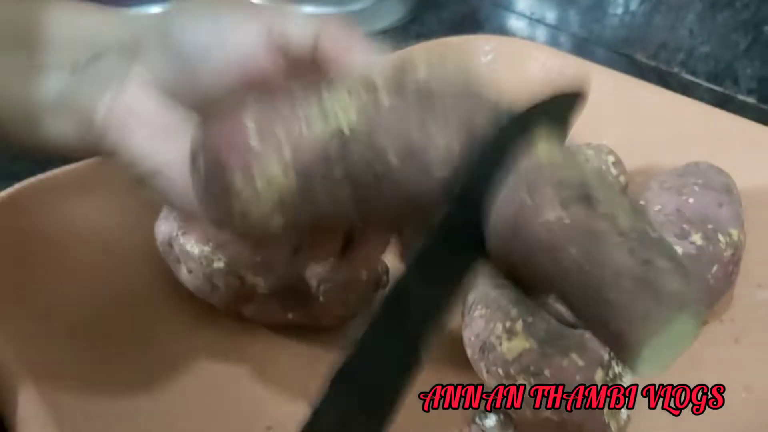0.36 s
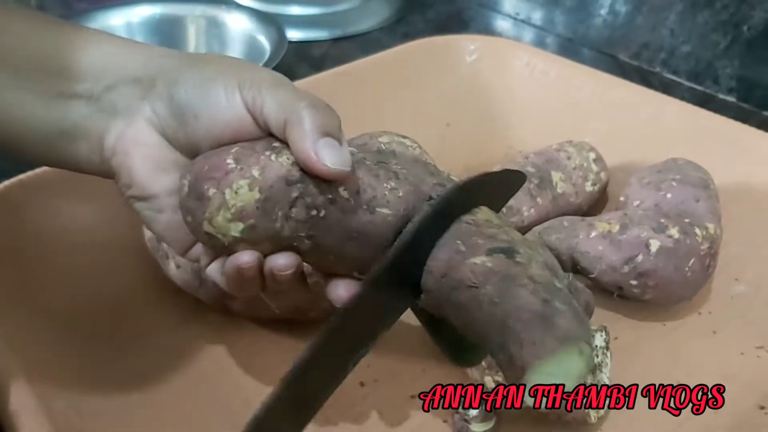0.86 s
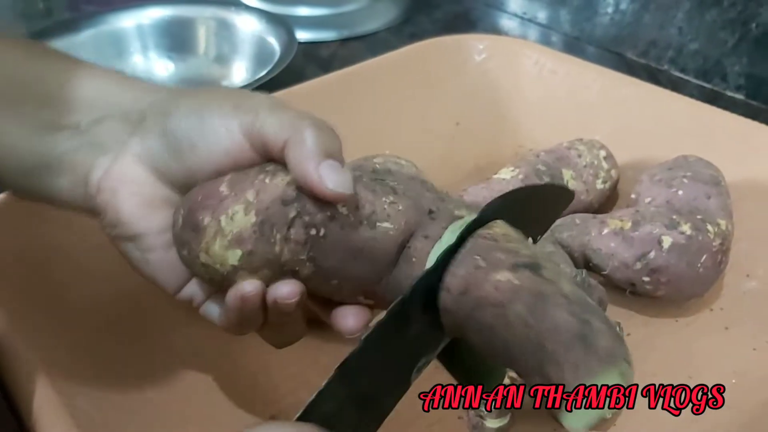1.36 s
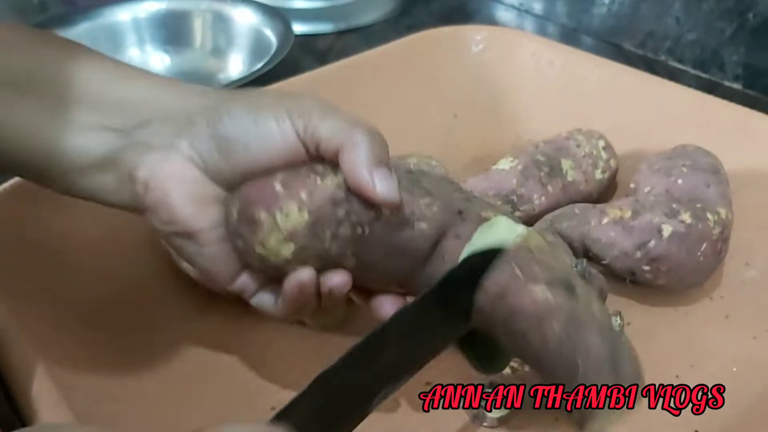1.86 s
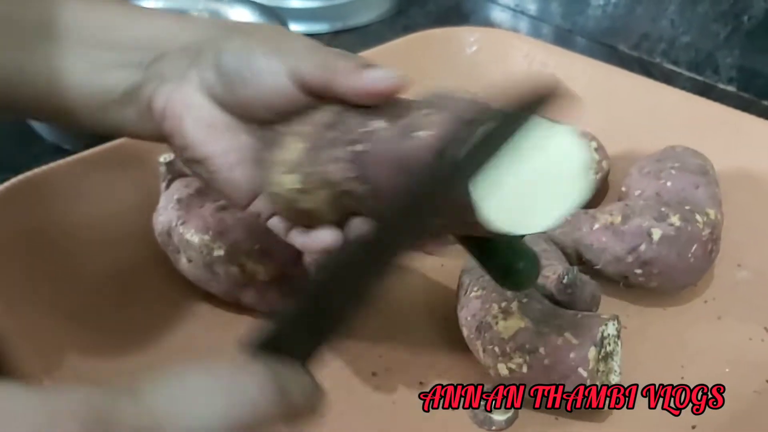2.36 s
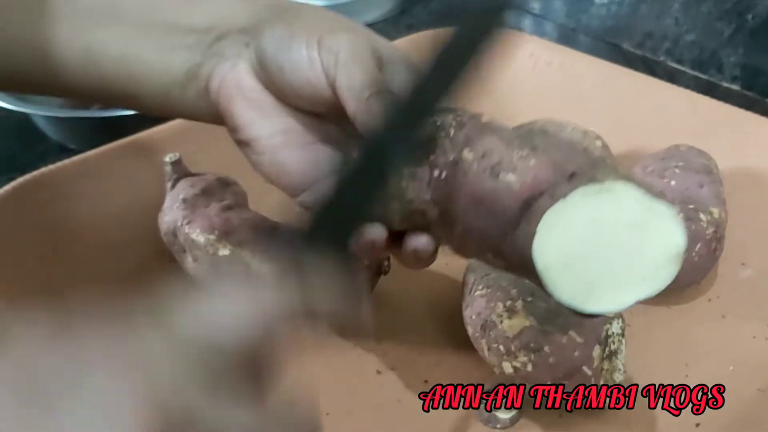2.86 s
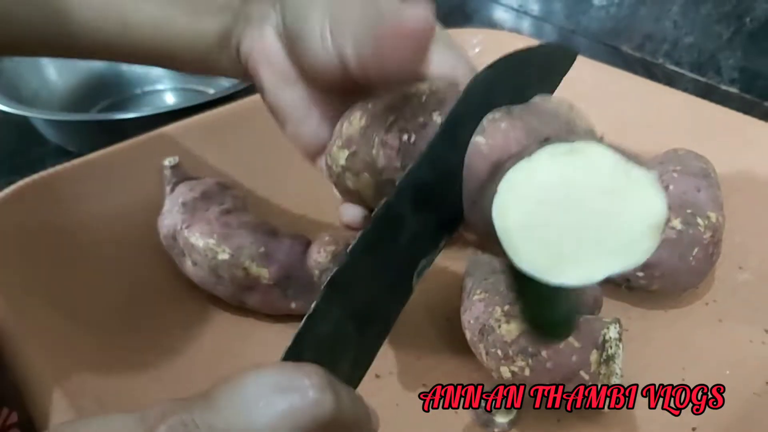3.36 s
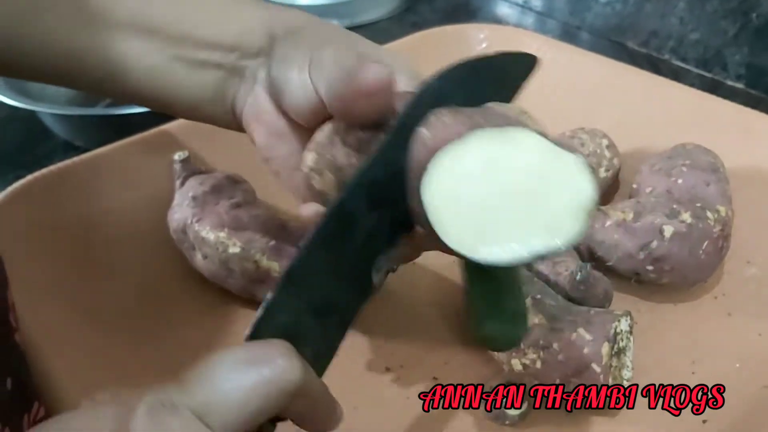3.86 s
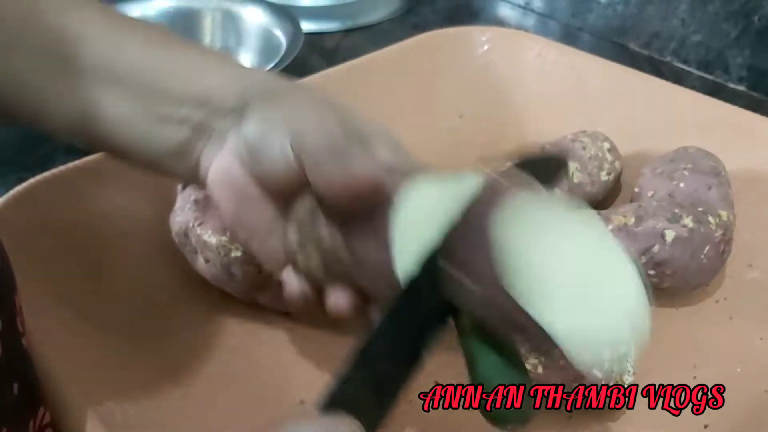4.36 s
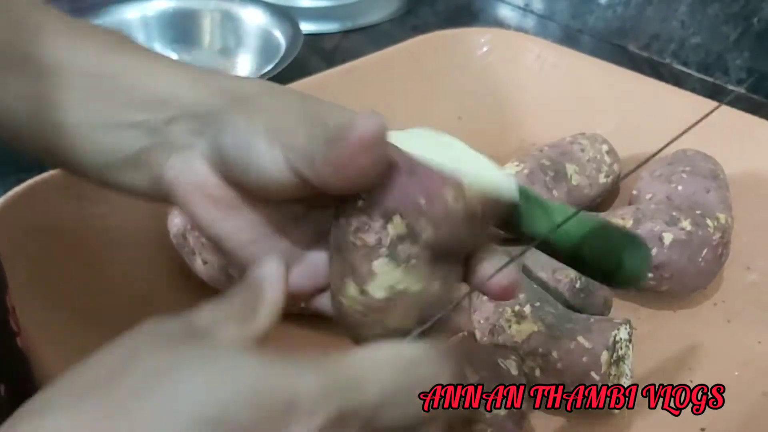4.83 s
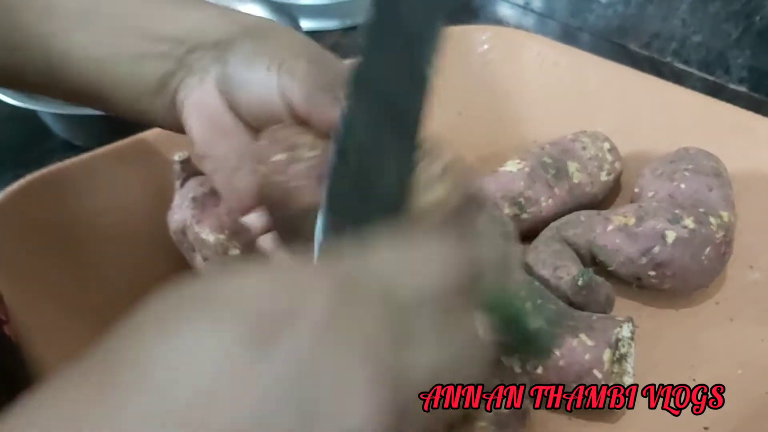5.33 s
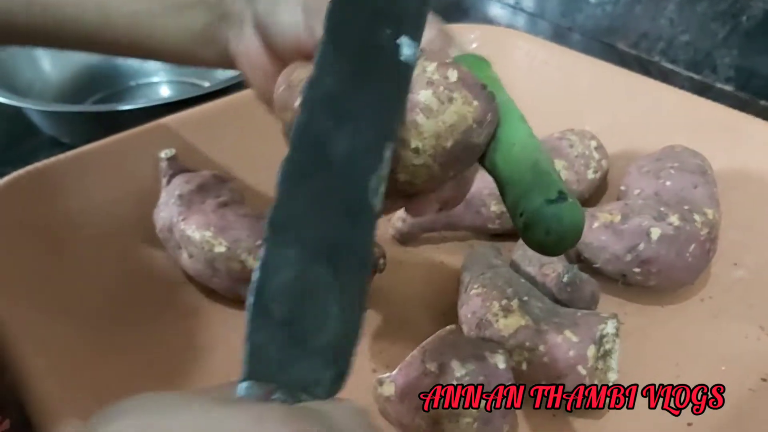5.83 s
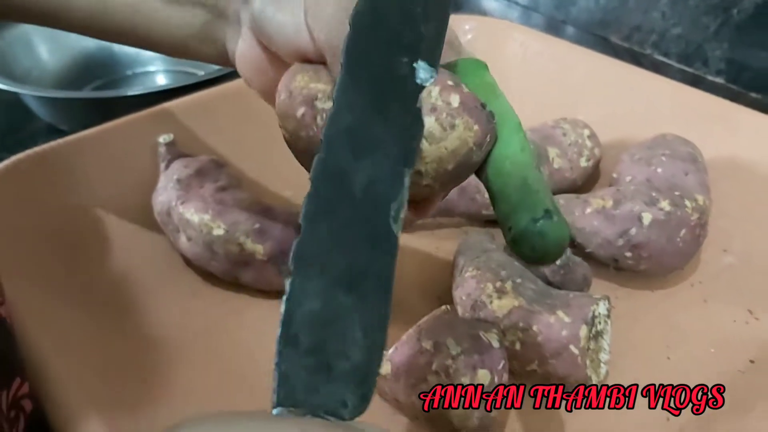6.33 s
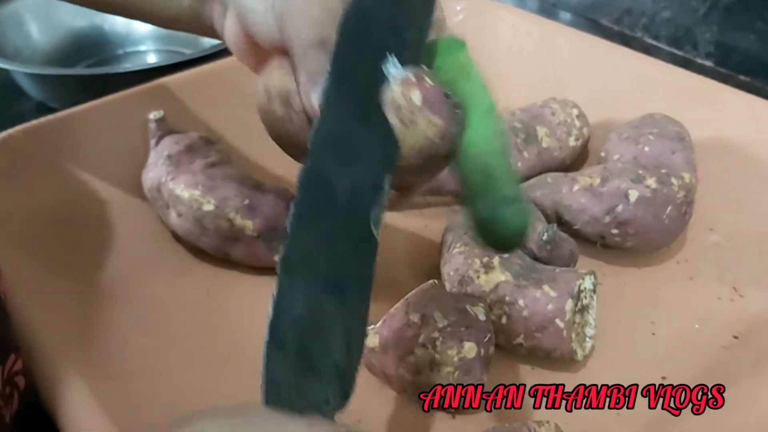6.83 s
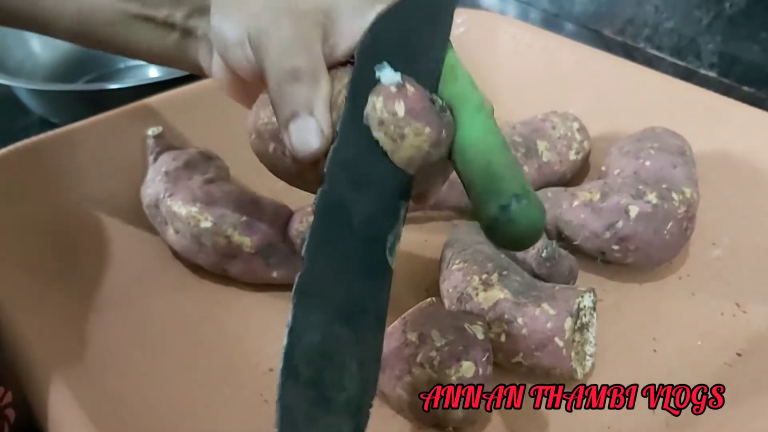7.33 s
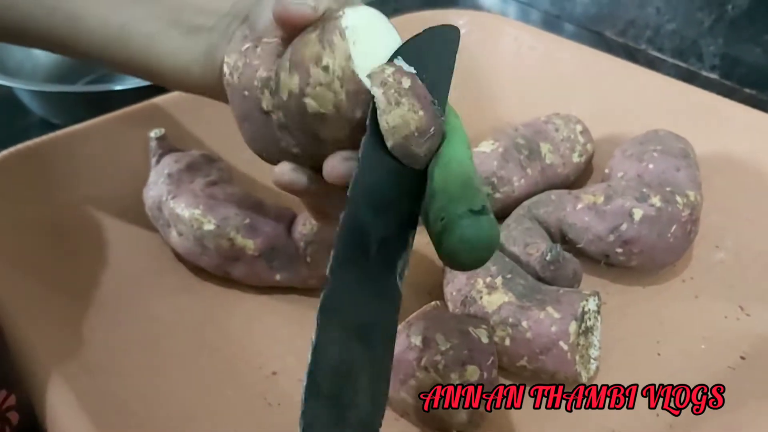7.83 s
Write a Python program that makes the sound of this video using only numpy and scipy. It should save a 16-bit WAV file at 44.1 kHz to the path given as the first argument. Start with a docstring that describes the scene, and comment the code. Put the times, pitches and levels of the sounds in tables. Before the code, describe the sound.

A kitchen blade saws and cracks through a raw starchy root, pieces thudding in a plastic tray, with a faint bird whistle in a hard room.

```python
"""In a hard room, a two-port microphone stands close to a fixed kitchen blade as a raw root is pushed onto it.
The blade saws the skin (noise and dense ticks) and the flesh splits in sharp cracks (band-shaped snaps).
Cut pieces drop and roll in a plastic tray (driven modes) and jolts shake the worktop (low noise).
The steel rings faintly (dying sines) and a far bird whistles falling notes (gliding sines);
early echoes, dense reverberation and quiet room tone surround them."""
import sys
import numpy as np
from scipy import signal
from scipy.fft import rfft, irfft, next_fast_len
from scipy.io import wavfile
from scipy.ndimage import uniform_filter1d

SR = 44100
rng = np.random.default_rng(int(sys.argv[2]) if len(sys.argv) > 2 else 0)


def undo_db(level):
    """Turn decibels back into plain size, where 20 dB means ten times bigger."""
    steps = np.asarray(level, float) / 20
    return 10 ** steps


def log_audio(samples):
    """Write samples as a 16-bit WAV file to the path given in sys.argv[1]."""
    # one column per channel
    frames = np.atleast_2d(samples).T
    # limit to full scale, then quantise
    limited = np.clip(frames, -1, 1)
    pcm = np.round(limited * 32767).astype(np.int16)
    wavfile.write(sys.argv[1], SR, pcm)


N = 361619

# flesh splitting, blade ticks, hard contacts: t/s, level/dB at 4-8 kHz, then relative to that
# level/dB under 1.8 kHz, level/dB at 1.8-4 kHz, level/dB over 8 kHz
CRACK_EVENTS = [(0.0739, -45, 11.5, 7, -12.5), (0.393, -24.5, -8.5, -0.5, -7),
                (0.3965, -18.5, -15, -9, -2.5), (0.398, -30.5, -18, -7, 0), (0.8201, -26, -26, -4.5, -5),
                (0.8313, -29, -20, 7, -3), (0.8456, -22.5, -27.5, -1, -3.5),
                (0.8581, -19.5, -22.5, 1.5, -8), (0.9102, -21, -21.5, 3.5, 0.5),
                (0.923, -22.5, -29, -5.5, 0.5), (0.9377, -22, -20.5, -9.5, -2.5),
                (0.9396, -16, -18.5, -1.5, -2), (0.9475, -19, -22.5, -20.5, 2.5),
                (0.9672, -25.5, -18.5, -13, 9.5), (0.9719, -26.5, -12, -5, 4), (1.3498, -51.5, -19, -3, 11),
                (1.9893, -32, -35, -12.5, 4.5), (2.0712, -35.5, -13.5, -4.5, -0.5),
                (2.0911, -42, 21.5, 13.5, -0.5), (2.1192, -26.5, 4.5, 11.5, 0.5),
                (2.1316, -34.5, 8.5, 9.5, -4), (3.1576, -22.5, -15, -4.5, -4.5),
                (3.1581, -19.5, -17, -7, -11.5), (3.1614, -21.5, -7.5, -8.5, -5),
                (3.1649, -38.5, -18, -9, -4), (3.7819, -44, -12.5, -10.5, 1), (4.1948, -46.5, -16, -3.5, 1),
                (4.287, -35.5, -25, -9, 1), (4.2923, -25, -38.5, -19, -1.5), (4.307, -23.5, -25.5, -11, 0),
                (4.3085, -22, -34.5, -17.5, 5.5), (4.3132, -25.5, -33.5, -18, 4),
                (4.317, -24, -29, -5, 5.5), (4.3242, -19, -26, -12, -1), (4.3378, -23, -27.5, -7.5, 7),
                (4.3528, -31, -20.5, -14.5, 11), (4.3644, -28.5, -24.5, -9.5, 16),
                (4.3685, -32.5, -23, -13.5, 13.5), (4.3803, -28.5, -21, -11.5, 11.5),
                (4.3833, -30, -24, -13, 12), (4.4934, -31.5, -25, -12.5, 3.5), (4.5562, -37, -9.5, 0, -8),
                (4.5718, -16.5, -8, 2.5, -7.5), (4.5738, -13.5, 1, -2, -5.5),
                (4.5755, -21, -4.5, 1.5, -5.5), (4.819, -37, 9, 7.5, -10.5), (4.8992, -52, 0, 5, -1),
                (4.941, -47.5, -8, 5.5, -1), (7.0169, -49.5, -20, -25, 7.5),
                (7.038, -33.5, -34, -23.5, 1.5), (7.2213, -52, -17.5, -16.5, 12),
                (7.3309, -50.5, -29.5, -16, 9), (7.3411, -51, -20, -12, 11), (7.351, -44, -34, -24, 13),
                (7.4854, -45.5, -33, -17, 7), (7.5942, -57.5, 0, -15, 15.5), (7.6156, -53.5, -6, -13, 6.5),
                (8.1847, -21.5, 0, -32, -21)]
# modes of the steel blade: f/Hz, level/dB, t60/s
STEEL_MODES = [(4678, -7, .12), (4980, 0, .09), (5782, -12, .06), (6702, -14, .06), (7400, -14, .03),
               (8050, -9, .04), (8952, -16, .08), (12110, -8, .1), (12510, -6, .09)]


def read(points, hz):
    """Looks a spectrum up on a log-frequency axis."""
    f, value = np.transpose(points)
    return np.interp(np.log(hz + 1), np.log(f + 1), value)


def evened(x):
    """Scales to rms 1."""
    return x / np.sqrt(np.mean(x ** 2) + 1e-20)


def colour(x, points):
    """Filters by a spectrum in dB."""
    size = next_fast_len(x.shape[-1])
    gain = undo_db(read(points, np.fft.rfftfreq(size, 1 / SR)))
    return irfft(rfft(x, size) * gain, size)[..., :x.shape[-1]]


def add(mix, s, sound):
    """Adds a sound at a time in seconds."""
    part = mix[..., round(s * SR):][..., :sound.shape[-1]]
    part += sound[..., :part.shape[-1]]


def ring(modes, seconds):
    """The impulse response of a set of dying modes."""
    t = np.arange(round(seconds * SR)) / SR
    return sum(undo_db(db - 60 * t / max(t60, .005)) * np.sin(2 * np.pi * hz * t) for hz, db, t60 in modes)


def diffuse(left, right):
    """Mixes two unrelated signals so that their likeness at the two ports depends on frequency."""
    # left-right likeness of diffuse sound: f/Hz, likeness (0 to 1)
    likeness = [(50, 0.3), (300, 0.12), (800, 1), (2000, 0.44), (16000, 0.17)]
    size = next_fast_len(len(left))
    same = np.clip(read(likeness, np.fft.rfftfreq(size, 1 / SR)), 0, .999)
    a, b = rfft(left, size), rfft(right, size)
    return irfft(np.array([a, same * a + np.sqrt(1 - same ** 2) * b]), size)[:, :len(left)]


def spells(rows):
    """Level and colour in dB over time from overlapping spells, whose powers add.

    Rows: (start s, length s, dB, end dB, 20 dB swell s, 20 dB fade s, colour dB).
    """
    power, tint = np.full(N, 1e-14), np.zeros(N)
    for s, length, db, end_db, swell_s, fade_s, colour_db in rows:
        # stretched to a 60 dB swell and fade
        swell_s, fade_s = 3 * max(swell_s, .001), 3 * max(fade_s, .001)
        end = s + max(length, 1e-4)
        part = slice(max(round((s - swell_s) * SR), 0), round((end + fade_s) * SR))
        t = np.arange(N)[part] / SR
        own_db = np.interp(t, [s - swell_s, s, end, end + fade_s], [db - 60, db, end_db, end_db - 60])
        own = undo_db(2 * own_db)  # power
        power[part] += own
        tint[part] += own * colour_db
    return 10 * np.log10(power), tint / power


def air():
    """Steady room tone and microphone hiss: coloured diffuse noise, drifting a little in level."""
    # spectrum of the room tone: f/Hz, level/dB per Hz
    tone_spectrum = [(24, -38), (40, -8), (85, 1), (216, -14), (341, -4), (823, -22), (1170, -17),
                     (3830, -34), (4920, -19), (6180, -28), (9240, -21), (15300, -31), (16500, -44)]
    level_db = -68
    drift_db = 1.2 * evened(uniform_filter1d(rng.standard_normal(N), 8000))
    tone = evened(colour(diffuse(*rng.standard_normal((2, N))), tone_spectrum))
    return undo_db(level_db + drift_db) * tone


def contact():
    """Level and treble share of the blade's strokes plus the short tearing that follows every crack."""
    # spells of blade in contact: t/s, length/s, level/dB at the start, level/dB at the end, treble share/dB
    strokes = [(0.01, 0.13, -54.5, -69, -37), (0.105, 0.24, -42, -75.5, -15),
               (0.418, 0.054, -40.5, -37, -3.5), (0.818, 0.046, -39.5, -39.5, -2),
               (0.868, .04, -45.5, -38.5, 4), (0.912, 0.018, -36.5, -32, -5),
               (0.936, 0.026, -26.5, -27, 1.5), (0.978, 0.14, -36.5, -49.5, -5.5),
               (1.316, 0.078, -51.5, -49, -1.26), (1.633, 0.25, -57, -70, -2.5),
               (1.846, 0.15, -47, -50, -0.5), (2, 0.043, -35.5, -50, -0.5),
               (2.058, 0.086, -43, -38.5, -11.5), (2.123, 0.044, -38.5, -50, -13.5),
               (3.108, 0.035, -58, -54, -14), (3.158, 0.24, -35.5, -59, 3.5),
               (3.678, 0.078, -45.5, -61, -2), (3.788, 0.067, -55.5, -53, -1),
               (3.831, 0.041, -46.5, -57, -1), (3.887, 0.073, -43.5, -71.5, -2),
               (4.047, 0.053, -53.5, -48.5, -1), (4.101, .08, -49, -49.5, -9.5),
               (4.19, 0.17, -46, -41, -1.5), (4.286, 0.011, -33, -28, 1.5), (4.31, 0.033, -22, -39, 0.3),
               (4.377, 0.034, -26, -40, 0.5), (4.444, 0.061, -39.5, -41.5, -0.3),
               (4.509, 0.072, -48, -59.5, -5.5), (4.59, .04, -37, -39.5, -7),
               (5.122, 0.16, -50.5, -68, -3.5), (5.94, 0.022, -76, -80.5, 8),
               (6.124, 0.14, -48.5, -66, -7.5), (6.302, .006, -40, -44, -2.5),
               (6.306, 0.18, -57, -71.5, -1), (6.515, 0.091, -55.5, -60, -3.5),
               (6.7, 0.075, -57.5, -55.5, -3), (6.859, 0.085, -53.5, -63, -1),
               (6.976, .05, -63.5, -45.5, -0.5), (7.058, 0.14, -55.5, -52, -3),
               (7.216, 0.31, -61.5, -57.5, -2), (7.358, 0.044, -60.5, -59, 0.5),
               (7.434, 0.041, -46.5, -54.5, -0.5), (7.616, 0.093, -49, -62.5, -3),
               (7.74, 0.055, -53, -49, 0), (7.805, .004, -29, -31, -1), (7.824, 0.28, -45, -77, -2),
               (8.117, 0.07, -47.5, -56.5, -9), (8.192, .01, -29.5, -39, -11)]
    # light strokes ease in, hard ones bite: level/dB, swell/s for 20 dB
    ease_in = [(-48, .014), (-40, .0015)]
    let_go_s = 0.034  # for 20 dB
    tear_db, tear_s, tear_fall_db = -2.5, 0.012, -32
    bite_db, bite_s = np.transpose(ease_in)
    rows = []
    for s, length, db, end_db, high_db in strokes:
        rows.append((s, length, db, end_db, np.interp(db, bite_db, bite_s), let_go_s, high_db))
    for s, db, _, mid_db, high_db in CRACK_EVENTS:
        top_db = db + max(mid_db / 2, high_db, 0) + tear_db
        rows.append((s, tear_s, top_db, top_db + tear_fall_db, 0, let_go_s / 2, min(high_db, 0) / 2))
    return spells(rows)


def sawing():
    """Dense fibre ticks under the stroke: smooth when light, crunchy when the flesh tears."""
    # spectrum of the scrape: f/Hz, level/dB per Hz
    scrape_spectrum = [(880, -13), (1500, -5.5), (2260, -8.5), (2970, -2.5), (4520, 1.5), (6960, -9),
                       (8090, -14), (14600, -22), (16000, -14.5), (16500, -25.5)]
    level_db, high_db = contact()
    tearing = np.clip((level_db + 45) / 25, 0, 1)
    hits = rng.random(N) < 6000 / SR  # about 6000 ticks a second
    height_db = 3.5 * np.minimum(rng.exponential(1, N), 4)
    ticks = hits * undo_db(height_db) * rng.choice([-1, 1], N)
    drive = (.3 + .7 * tearing) * evened(ticks) + .7 * rng.standard_normal(N)
    chatter_db = (1.5 + 2.5 * tearing) * evened(uniform_filter1d(rng.standard_normal(N), 300))
    scrape = colour(drive * undo_db(chatter_db), scrape_spectrum)
    # light strokes are thin: they lose the sound below about 2 kHz
    thinness = np.clip((-45 - level_db) / 10, 0, .8)
    scrape = scrape - thinness * colour(scrape, [(1800, 0), (3000, -30)])
    high = colour(scrape, [(4000, -40), (8000, 0)])
    high_share = np.clip(undo_db(high_db), 0, .99)
    low_share = np.sqrt(1 - high_share ** 2)
    strokes = undo_db(level_db) * (high_share * evened(high) + low_share * evened(scrape - high))
    steel_hum = signal.oaconvolve(strokes, ring(STEEL_MODES, .3))[:N]
    return strokes + undo_db(-47) * steel_hum


def cracks():
    """Each crack is one sharp snap inside a millisecond of splintering, with a short fizz after it.

    Its directions average out in the room, which hears an even click.
    """
    snap_height = 1.8  # against the splintering
    pan_db = 2.5  # cracks scatter left and right along the root
    lag_spread = 3  # samples, random late arrival at the right port
    out, far, t = np.zeros((2, N)), np.zeros(N), np.arange(500) / SR
    noise = rng.standard_normal((len(CRACK_EVENTS), len(t)))
    splinter_and_fizz = np.exp(-t / .0006) + .2 * np.exp(-t / .0025)
    shape = np.minimum(t / .0003, 1) * splinter_and_fizz
    snap = snap_height * (np.arange(len(t)) == 10)
    edges = (400, 1800, 4000, 8000, 17000)  # Hz
    bands = [signal.butter(3, pair, "band", fs=SR, output="sos") for pair in zip(edges, edges[1:])]
    clicks = [signal.sosfilt(band, snap) for band in bands]
    clicks = [click / np.std(click[:70]) for click in clicks]
    for (s, db, low_db, mid_db, high_db), z in zip(CRACK_EVENTS, noise):
        gains = undo_db(db + np.array([low_db, mid_db, 0, high_db]))
        parts = [signal.sosfilt(band, z * shape + snap) for band in bands]
        crack = sum(gain * part / np.std(part[:70]) for gain, part in zip(gains, parts))
        pan = undo_db(pan_db * z[0] * np.array([[.5], [-.5]]))
        late = np.roll(crack, round(lag_spread * abs(z[1])))
        add(out, s, pan * np.array([crack, late]))
        add(far, s, sum(gain * click for gain, click in zip(gains, clicks)))
    return out, far


def tray():
    """Soft blows and a rolling rub both drive the same plastic modes; heavy pieces move the lowest one."""
    # modes of the plastic tray: f/Hz, level/dB, t60/s when struck
    modes = [(164.5, -6.5, 0.23), (251.5, -15, 0.27), (316.4, -4.5, 0.4), (365, 1.5, 0.11),
             (390, -8, 0.082), (473, -13.5, 0.19), (575, -21.5, 0.027), (630, -14.5, 0.051),
             (800, 4, 0.006), (900, -11, 0.035)]
    # pieces landing in the tray: t/s, peak level/dB ahead of the bass cut, contact time/ms
    blows = [(0.933, -33, 0.98), (2.043, -35.5, 5.4), (2.082, -5.5, 6.9), (2.12, -4.5, 2.84),
             (2.236, -19.5, 4.5), (2.303, -26, 3.2), (3.157, -30, 1.3), (4.557, -34, 3.6),
             (4.571, -51, 4.1), (4.7, -56, 2.4), (4.815, -23, 2.5), (4.865, -54, 4.5), (5.319, -44.5, 1.5),
             (5.35, -44, 1.5), (7.592, -43.5, 1.6), (7.612, -41.5, 1.8), (7.64, -59, 1.9)]
    # pieces rocking to rest: t/s of the strongest moment, level/dB, swell/dB per s, fade/dB per s,
    # lowest mode level/dB against the others
    rolls = [(0.079, -49, 2500, 118, -40), (0.122, -47, 305, 190, -16.5), (0.393, -47, 3299, 68, -3),
             (2.049, -42.5, 2500, 278, 7.5), (2.091, -21, 1607, 159, 5), (2.132, -27, 497, 210, -2),
             (2.199, -40, 330, 78, 10), (4.574, -24, 3002, 189.5, -17.5), (4.715, -30, 900, 400, -12.5),
             (4.83, -36.5, 1499.5, 208, -9), (4.879, -44, 800, 86.5, -12.5), (5.323, -40.5, 2002, 142, -24),
             (5.361, -40.5, 356, 111, -22), (7.62, -52.5, 900, 39, -16), (8.19, -35, 2496, 483, -43)]
    body, out = ring(modes, .6), np.zeros(N)
    for s, db, push_ms in blows:
        push = np.hanning(max(round(push_ms * SR / 1000), 4))
        blow = signal.fftconvolve(body, push)
        add(out, s, undo_db(db) * blow / abs(blow).max())
    rows = [(s, 0, db, db, 20 / swell, 20 / fade, low_db) for s, db, swell, fade, low_db in rolls]
    rock_db, lowest_db = spells(rows)
    rub = rng.standard_normal(N) * uniform_filter1d(undo_db(rock_db), 200)
    damped = [(hz, db, 0.36 * t60) for hz, db, t60 in modes]  # the pieces lying in it damp the tray
    lowest, upper = ring(damped[:1], 0.2), ring(damped[1:], .3)
    out += signal.oaconvolve(rub * undo_db(lowest_db), lowest / np.linalg.norm(lowest))[:N]
    out += signal.oaconvolve(rub, upper / np.linalg.norm(upper))[:N]
    skin_spectrum = [(200, -16.0), (500, 2.5), (1500, -24.5), (3000, -9.5), (8000, -34.5)]
    skin = undo_db(-32.5) * colour(rub, skin_spectrum)
    bass_cut = signal.butter(3, 130, "high", fs=SR, output="sos")  # too small for deep bass
    return signal.sosfilt(bass_cut, out + skin)


def shake():
    """Low lumpy vibration through the stand: coloured noise, nearly alike in both ports."""
    # jolts that shake the worktop under the microphone: t/s of the strongest moment, level/dB,
    # fade/s for 20 dB (1 ms at least)
    jolts = [(0.436, -38, 0.33), (0.472, -40, 0.01), (0.802, -56, 1.1), (2.056, -28.5, -0.0743),
             (2.097, -20.5, 0.3172), (2.135, -23, 0.13), (3.167, -50, 0.14), (4.342, -55, 0.15),
             (4.572, -36.5, 0.11), (4.72, -38.5, 0.16), (4.835, -38.5, 0.15), (6.998, -65.5, 0.8),
             (7.62, -66.5, 0), (8.186, -58.5, 2.7)]
    # spectrum of the vibration: f/Hz, level/dB per Hz
    rumble_spectrum = [(20, -36), (35, -21), (60, 2.5), (100, 3.5), (140, -7.5), (250, -36)]
    jolt_s = .011  # for a 20 dB swell
    same = .97  # left-right likeness
    level_db = spells([(s, 0, db, db, jolt_s, fade_s, 0) for s, db, fade_s in jolts])[0]
    a, b = rng.standard_normal((2, N))
    pair = np.array([a, same * a + np.sqrt(1 - same ** 2) * b])
    low = evened(colour(pair, rumble_spectrum))
    return low * undo_db(level_db + np.array([[-2.0], [2.0]]))


def bird():
    """A falling, slightly hoarse whistle: a sine whose glide slows towards its end pitch."""
    # falling whistles: t/s, length/s, glide time constant/s, loudest after/s, level/dB
    whistles = [(0.597, 0.19, 0.13, 0.1, -57.5), (5.385, 0.34, 0.12, 0.092, -59.5),
                (7.072, 0.36, 0.1, 0.11, -49.5)]
    top_hz, end_hz = 5540, 2150
    swell_s, fade_s = 0.75, 0.21  # for 20 dB
    out = np.zeros(N)
    wobble = 1 + .028 * evened(uniform_filter1d(rng.standard_normal(N), 150))
    for s, length, glide_s, loudest_s, db in whistles:
        t = np.arange(round(length * SR)) / SR
        glide_hz = end_hz + (top_hz - end_hz) * np.exp(-t / glide_s)
        hz = glide_hz * wobble[round(s * SR):][:len(t)]
        level = undo_db(db - 20 * np.maximum((loudest_s - t) / swell_s, (t - loudest_s) / fade_s))
        whistle = np.sin(2 * np.pi * np.cumsum(hz) / SR)
        add(out, s, level * signal.windows.tukey(len(t), .1) * whistle)
    return out


def steel():
    """Light grazing touches leave the free blade ringing; the place touched favours low or high modes."""
    # touches that ring the blade: t/s, peak level/dB, level/dB of the modes over 10 kHz against the rest
    touches = [(4.4938, -29, 18), (5.5446, -37, -3.5), (5.5597, -32, 0), (5.891, -51.5, -5),
               (5.9252, -48, -10), (7.3491, -53.5, -1)]
    graze_s = .004
    out, graze = np.zeros(N), np.hanning(round(graze_s * SR))
    noise = rng.standard_normal((len(touches), len(graze)))
    for (s, db, high_db), z in zip(touches, noise):
        modes = [(hz, mode_db + high_db * (hz > 10000), t60) for hz, mode_db, t60 in STEEL_MODES]
        blade = signal.fftconvolve(ring(modes, .3), z * graze)
        add(out, s - graze_s / 2, undo_db(db) * blade / abs(blade).max())
    return out


def nearby(x):
    """Tray walls, hands and worktop throw a few early echoes, other ones at each port."""
    taps = np.zeros((2, 900))
    at, sign = rng.integers(20, 900, (2, 12)), rng.choice([-1., 1.], (2, 12))  # at: samples
    np.put_along_axis(taps, at, sign * undo_db(-10.5 - 16 * at / 900), 1)  # later ones are weaker
    echoes = signal.oaconvolve(x, taps, axes=1)[:, :N]
    return x + signal.lfilter(*signal.butter(2, 350, "high", fs=SR), echoes)


def room(x, gap_s, count=3):
    """Dense reflections, each band dying at its own speed; small moves of the source change their pattern."""
    # reverberation time: f/Hz, t60/s
    decay_times = [(100, 0.29), (260, 0.78), (700, 0.46), (1840, 0.65), (4850, 0.66), (12800, 0.5)]
    # spectrum of the reverberation at its start: f/Hz, level/dB
    tail_spectrum = [(100, -32.5), (500, 4), (1500, 8.5), (4000, 6.5), (6500, 5), (9000, 8), (16000, 6.5)]
    out, phase = 0, 2 * np.pi * 7 * np.arange(N) / SR  # the pattern turns at 7 Hz
    for k in range(count):
        hz, t, z = signal.stft(diffuse(*rng.standard_normal((2, SR))), SR, nperseg=256)
        t60 = np.maximum(read(decay_times, hz), .05)[:, None]
        decay = undo_db(read(tail_spectrum, hz)[:, None] - 60 * t / t60)
        tail = signal.istft(z * decay, SR, nperseg=256)[1]
        tail = tail * np.clip(np.arange(tail.shape[1]) / SR / gap_s, 0, 1)  # builds up over gap_s
        share = np.sqrt(2 / count) * np.cos(phase + np.pi * k / count)
        out = out + signal.fftconvolve((share * x)[None], tail / np.linalg.norm(tail[0]), axes=1)[:, :N]
    return out


def scene():
    """Near sources reach the left port first; the room, a little louder at the right port, surrounds them."""
    right_lag = 4  # samples
    right_db = 6.5  # right port over left, for room sound and air
    (snaps, clicks), blade, rings, pieces = cracks(), sawing(), steel(), tray()
    near = snaps + (blade + rings) * undo_db(np.array([[-3.0], [-2.0]]))
    near = near + pieces * undo_db(np.array([[-2.5], [1.5]]))
    near[1] = np.roll(near[1], right_lag)
    sent = undo_db(-5.5) * clicks + undo_db(-18) * rings + undo_db(-10.0) * blade + undo_db(3.0) * pieces
    wet = room(sent + bird(), gap_s=0.003)  # the far bird is heard through the room alone
    return nearby(near) + shake() + (wet + air()) * undo_db(right_db * np.array([[-.5], [.5]]))


def roll_off(x):
    """The treble ends steeply here."""
    return signal.sosfilt(signal.butter(12, 17020, fs=SR, output="sos"), x)


def record(dry):
    """The microphone loses the deepest bass; the highest peaks are gently rounded."""
    heard = signal.sosfilt(signal.butter(4, 45, "high", fs=SR, output="sos"), dry)
    return roll_off(np.tanh(heard))


dry = scene()
out = record(dry)
log_audio(out)
```